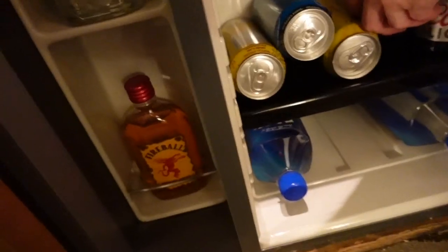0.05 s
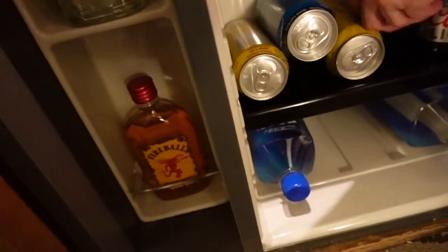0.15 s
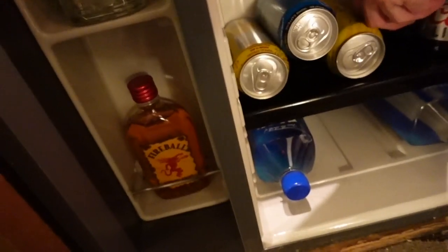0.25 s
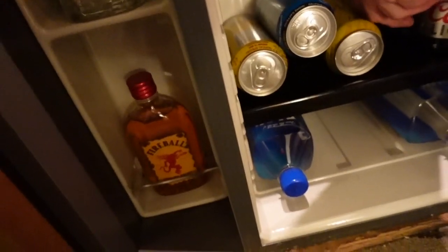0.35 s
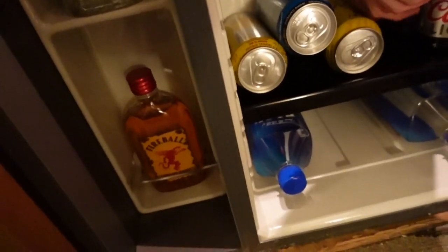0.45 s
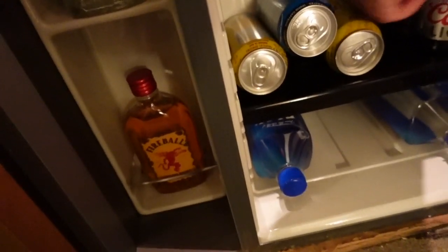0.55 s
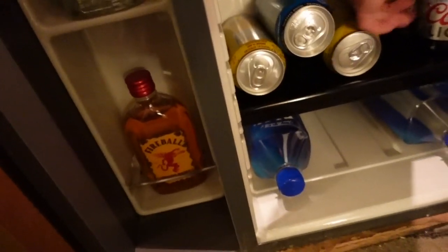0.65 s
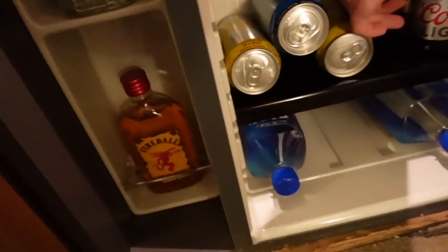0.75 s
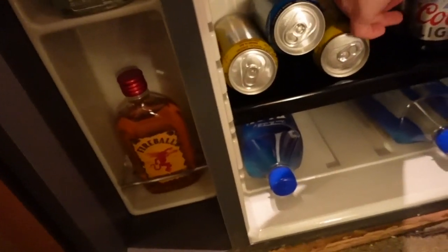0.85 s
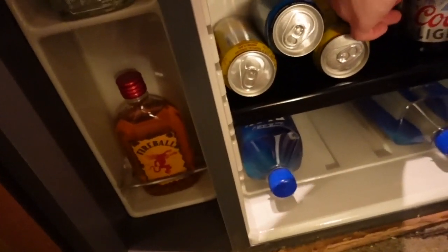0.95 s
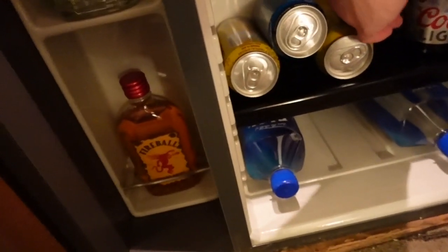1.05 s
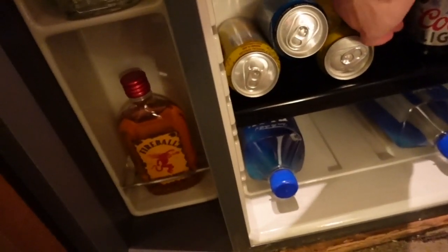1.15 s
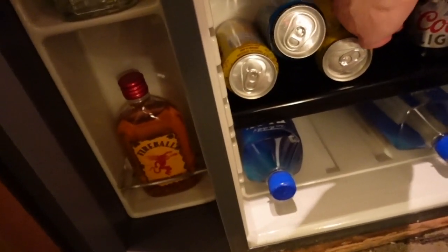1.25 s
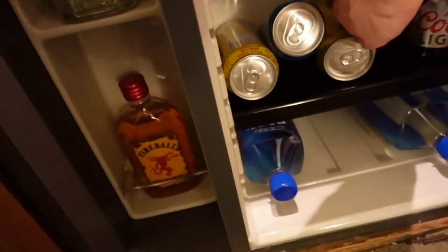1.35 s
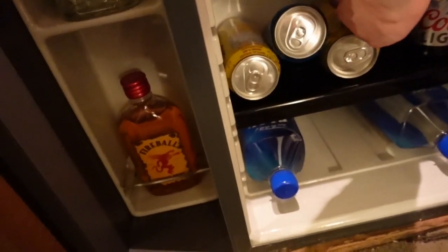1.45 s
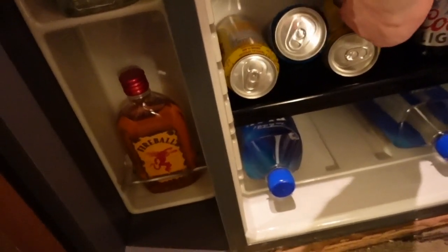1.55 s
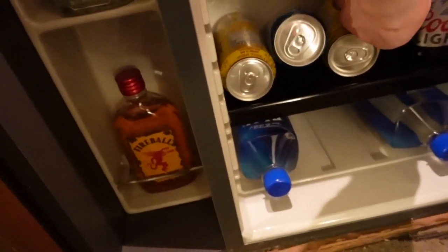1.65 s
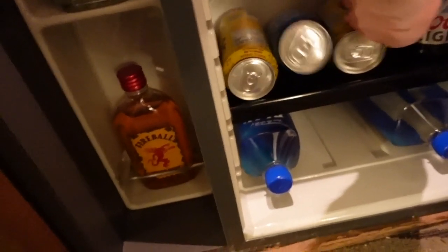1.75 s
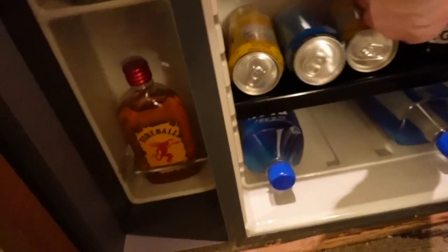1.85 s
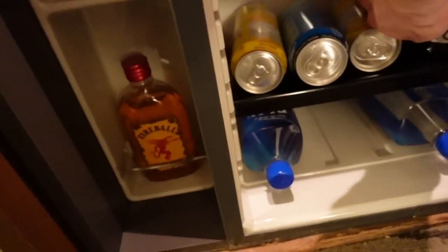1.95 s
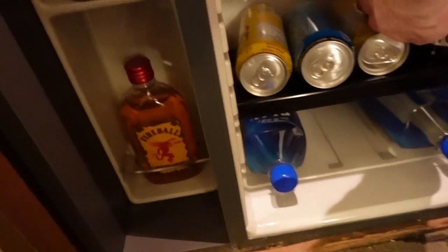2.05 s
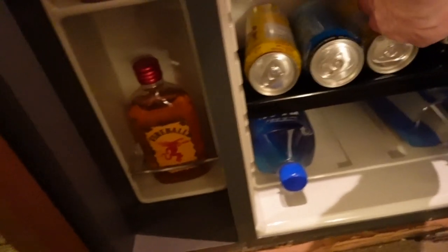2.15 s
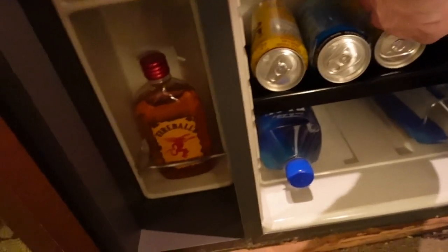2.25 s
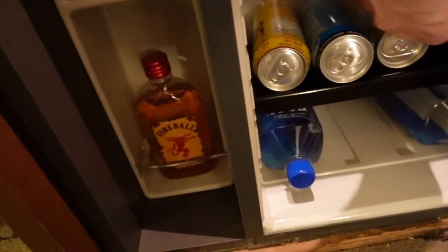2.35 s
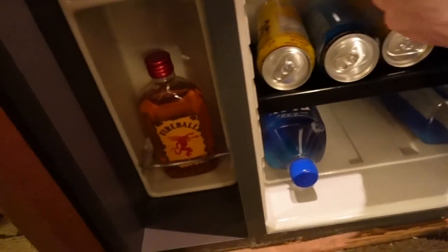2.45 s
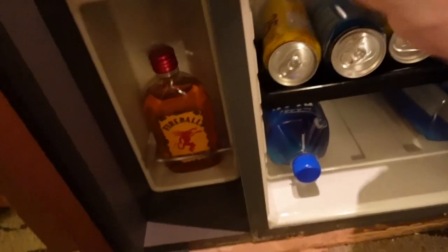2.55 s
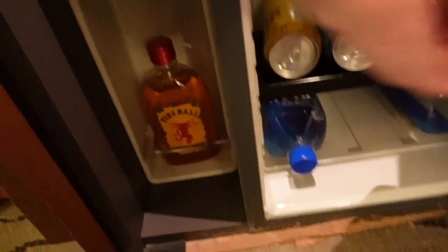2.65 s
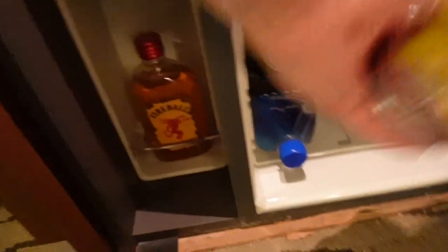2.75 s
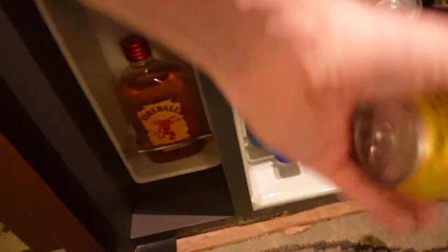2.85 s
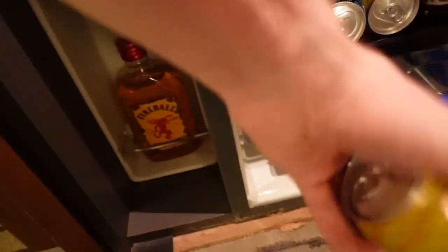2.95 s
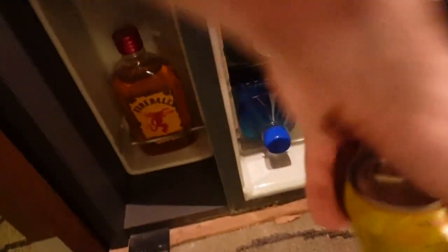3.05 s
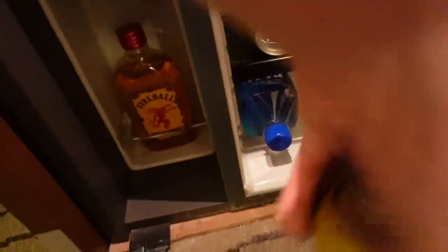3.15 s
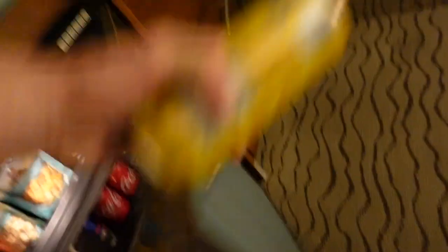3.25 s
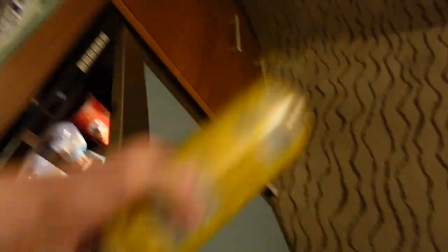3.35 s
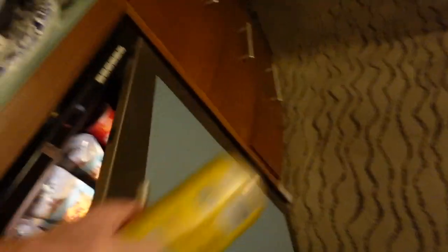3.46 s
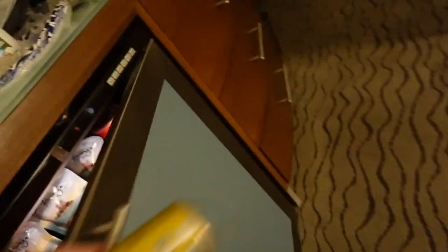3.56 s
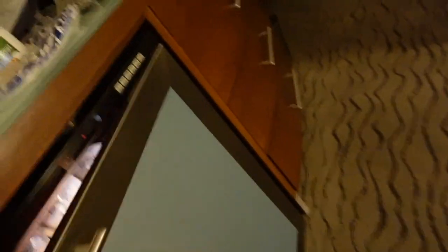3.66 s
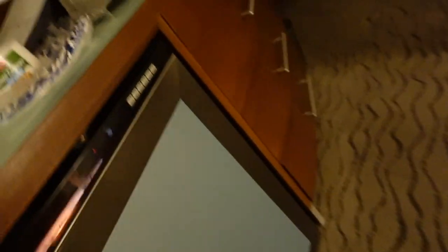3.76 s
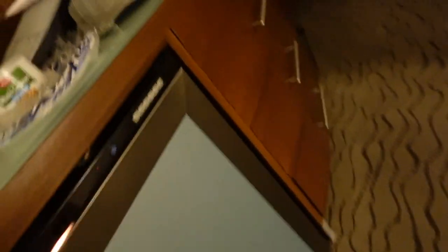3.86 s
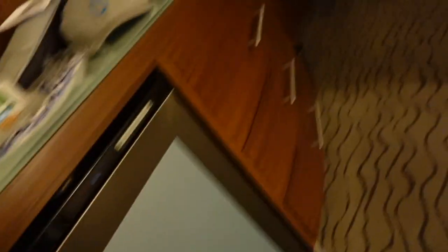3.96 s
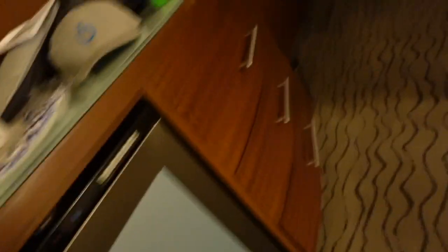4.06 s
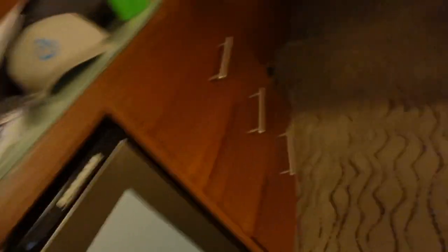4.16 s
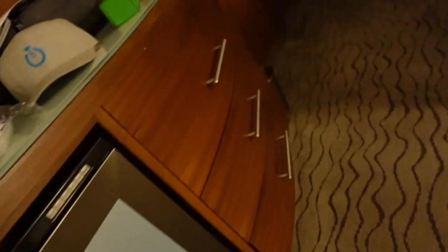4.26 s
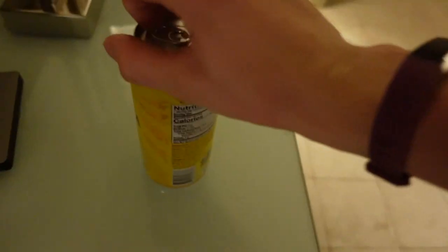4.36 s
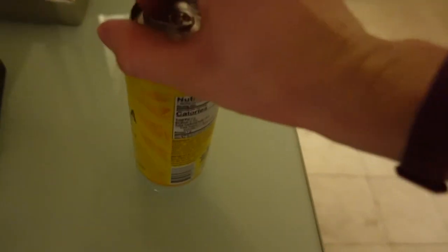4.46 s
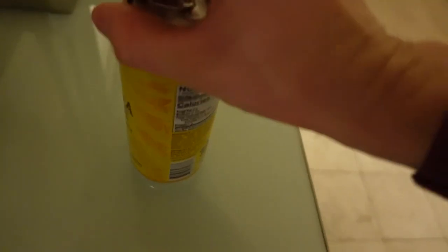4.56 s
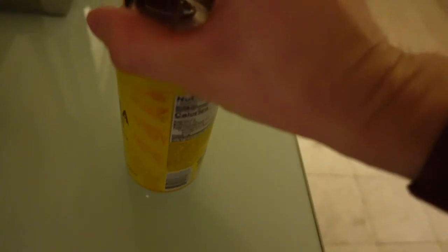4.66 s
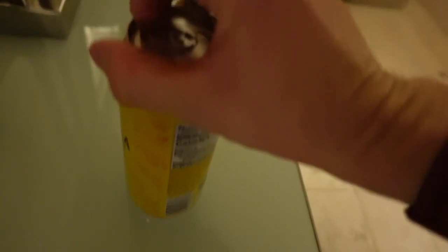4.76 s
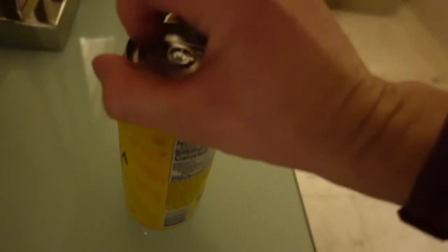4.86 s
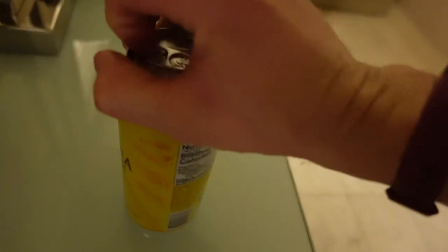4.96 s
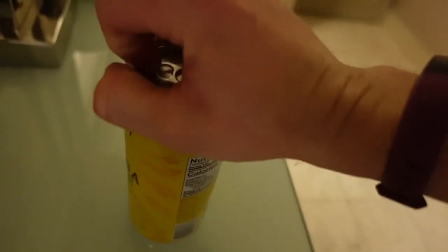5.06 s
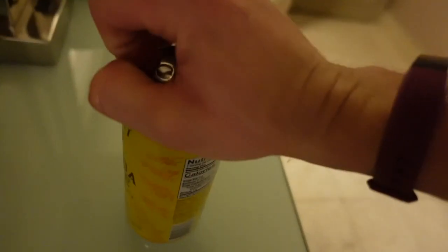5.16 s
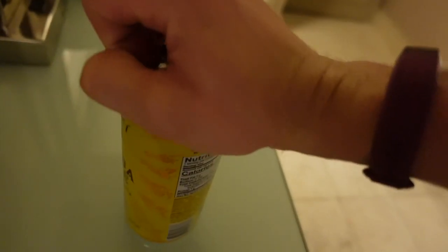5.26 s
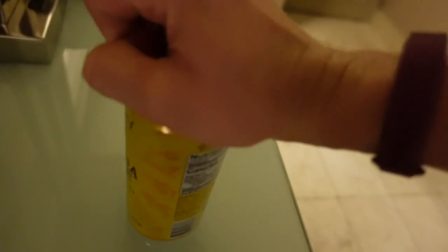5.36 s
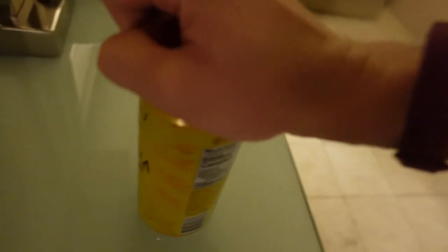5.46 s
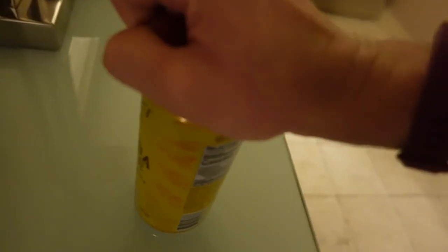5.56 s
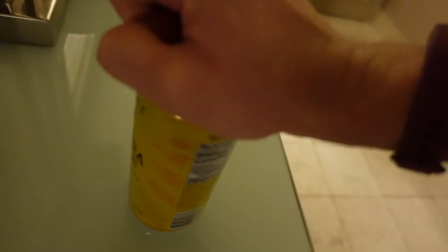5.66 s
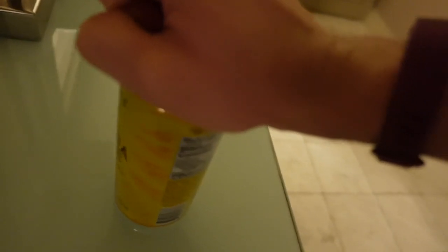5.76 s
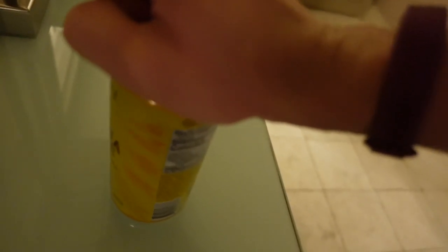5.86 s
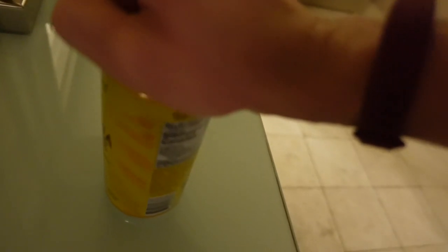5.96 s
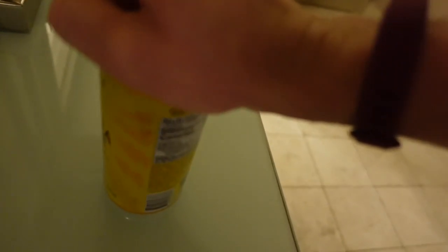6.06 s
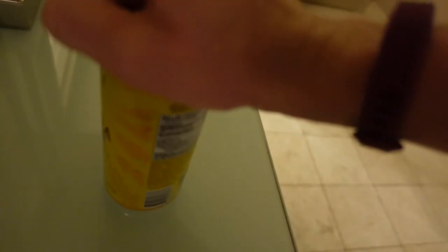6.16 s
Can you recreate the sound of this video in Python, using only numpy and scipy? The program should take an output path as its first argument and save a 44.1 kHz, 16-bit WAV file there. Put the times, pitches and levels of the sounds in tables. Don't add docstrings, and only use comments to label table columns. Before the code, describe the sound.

Close, slightly thin stereo sound, with a short room echo. From 0 to 3.3 seconds a small fridge hums under faint air noise. Fingers rustle on skin and foil, with light can knocks at 0.1, 0.3 and 0.6 and soft shelf thumps until 1.1. At 1.4 a hard clank rings; from 1.7 to 2.2 full cans bang, roll and ring in a dense cluster, the shelf thumping deeply at 1.9. Lighter taps and bright scrapes continue to 3.3 as a can is lifted out. Then quiet room air, with small ticks at 3.35 and 3.7. At 3.93 a door slaps shut with a short low boom and tiny rebounds to 4.2. From 4.5 to 5.5 a fingernail ticks and slides faintly on the lid. Sharp metallic cracks at 5.58, 5.77, 5.85 and 5.99, the last loudest, each release hissing, whistling gas, the final jet draining by 6.2.

```python
import sys
import numpy as np
from scipy import signal
from scipy.fft import rfft, irfft, next_fast_len
from scipy.io import wavfile
from scipy.ndimage import uniform_filter1d

SR = 44100
rng = np.random.default_rng(int(sys.argv[2]) if len(sys.argv) > 2 else 0)


def level_to_linear(level):
    exponent = np.asarray(level, float) / 20
    return 10 ** exponent


def generate_wav(sig):
    pcm = np.round(np.clip(np.atleast_2d(sig).T, -1, 1) * 32767).astype(np.int16)
    wavfile.write(sys.argv[1], SR, pcm)


N = 273506
T = np.arange(N) / SR
CHANGE_S = 3.322
SHELF_HZ = 147.2


def evened(x):
    return x / np.sqrt(np.mean(x ** 2) + 1e-20)


def read(points, hz):
    f, value = np.transpose(points)
    return np.interp(np.log(hz + 1), np.log(f + 1), value)


def add(mix, start_s, sound):
    part = mix[round(start_s * SR):][:len(sound)]
    part += sound[:len(part)]


def passed(x, order, hz, kind):
    return signal.lfilter(*signal.butter(order, hz, kind, fs=SR), x)


def tuned(x, hz, width_hz):
    return signal.lfilter(*signal.iirpeak(hz, hz / width_hz, SR), x)


def resonate(x, hz, width_hz):
    turn = np.exp(2j * np.pi * np.cumsum(hz * np.ones(len(x))) / SR)
    r = np.exp(-np.pi * width_hz / SR)
    return 2 * (turn * signal.lfilter([1 - r], [1, -r], x / turn + 1e-18)).real


def colour(x, points, modes_db=0):
    size = next_fast_len(len(x), True)
    hz = np.fft.rfftfreq(size, 1 / SR)
    knots_hz = np.arange(0, SR / 2, 45)
    peaks = np.interp(hz, knots_hz, rng.standard_normal(len(knots_hz)))
    gain = level_to_linear(read(points, hz) + modes_db * peaks)
    return evened(irfft(rfft(x, size) * gain, size)[:len(x)])


def flicker(hz, depth_db):
    return level_to_linear(depth_db * evened(passed(rng.standard_normal(N), 1, hz, "low")))


def envelope(t60, rise, size=12000):
    t = T[:size]
    return level_to_linear(-60 * t / max(t60, .005)) * (1 - np.exp(-t / max(rise, 1e-4)))


def ring(hz, t60, rise, phase=0):
    fade = envelope(t60, rise)
    return np.sin(2 * np.pi * hz * T[:len(fade)] + phase) * fade


def clink(hz, t60):
    fade = envelope(t60, 0.00071)
    rough = evened(tuned(rng.standard_normal(len(fade)), hz, 0.199 * hz + 20))
    return 0.76 * ring(hz, t60, 0.00046) + 0.44 * rough * fade


def click(low_hz, high_hz):
    pulse = passed(signal.unit_impulse(400), 2, [low_hz, high_hz], "band")
    return pulse / abs(pulse).max()


def burst(points, t60, rise, treble_db=0):
    fade = envelope(t60, rise)
    noise = colour(rng.standard_normal(len(fade)), points, modes_db=4.5)
    dull = passed(noise, 2, 4500, "low")
    bright = passed(noise, 2, 4500, "high")
    return dull * fade + level_to_linear(treble_db) * bright * envelope(0.5 * t60, rise)


# pitch_hz, level_db (per Hz)
FRIDGE = [(15, -79), (25, -26.5), (59, -34.5), (122, -3), (240, -16), (346, -27), (485, -21), (645, -12.5),
          (978, -13.5), (1780, -24), (2310, -32.5), (2630, -15.5), (9890, -17.5), (11600, -17.5),
          (12500, -48)]
ROOM = [(15, -58.5), (25, -31), (64, -17), (113, -2.5), (200, -3.5), (383, -14), (566, -4), (628, -3.5),
        (1080, -16.5), (1480, -16), (1920, -14), (3230, -22), (3680, -22.5), (10400, -33), (12500, -37.5)]
# pitch_hz, width_hz, level_db
FRIDGE_HUM = [(116.7, 12, -54), (637, 110, -61), (839, 25, -64.5), (1600, 110, -62.5), (1910, 40, -69)]
ROOM_HUM = [(128.8, 15, -70), (209, 7.7, -62.5), (646, 74, -71.5), (2060, 120, -71), (2250, 90, -73)]
# pitch_hz, likeness (0 to 1)
SAME_FLOOR = [(60, 0.96), (170, 1), (500, 0.12), (1460, 0.139), (4240, 0.36), (12300, 0.62)]


def air(points, level_db, hums):
    sides = []
    for _ in range(2):
        side = level_to_linear(level_db) * colour(rng.standard_normal(N), points)
        for hz, width_hz, hum_db in hums:
            side += level_to_linear(hum_db) * evened(tuned(rng.standard_normal(N), hz, width_hz))
        sides.append(side)
    left, other = sides
    size = next_fast_len(N, True)
    same = np.clip(read(SAME_FLOOR, np.fft.rfftfreq(size, 1 / SR)), 0, 1)
    right = irfft(same * rfft(left, size) + np.sqrt(1 - same ** 2) * rfft(other, size), size)[:N]
    return np.array([left, right]) * flicker(hz=2.7, depth_db=-0.64)


# pitch_hz, level_db, t60_s
CANS = [(377, -14.5, 0.078), (425, -1.5, 0.067), (585.7, -5, 0.27), (827, -4.5, 0.12), (961, -7, 0.24),
        (1067, -11.5, 0.18), (1181, -10.5, 0.43), (1526, -10, .2), (1950, -16, 0.14), (2707, -7, .08),
        (3206, -15.5, 0.26)]
# time_s, level_db
ROLLING = [(0, -90), (.5, -86), (.63, -52), (.86, -64.5), (1.02, -56), (1.15, -77), (1.39, -52.5),
           (1.46, -41.5), (1.62, -50.5), (1.712, -44), (1.8, -56), (1.86, -27), (2.15, -32.5), (2.3, -41),
           (2.8, -51), (3, -50), (3.07, -60), (3.33, -50)]
# peak_s, level_db, swell_s, fade_s (both per 20 dB)
STROKES = [(.17, -66.5, .4, 0.5), (.38, -59, .09, 0.2), (.78, -53.5, 0.33, 1), (.92, -45, 0.15, 0.14),
           (1.395, -46.5, 0.2, 0.1), (1.71, -34.5, 0.057, 0.02), (1.67, -49, 0.28, 0.7),
           (2.001, -32, .22, 0.01), (2.72, -53.5, 0.16, 9), (3, -46.5, 0.47, .5), (3.3, -57, .3, 2.5),
           (2.575, -48, 0.079, 0.2)]
# pitch_hz, level_db (per Hz)
RUSTLE = [(710, -26.5), (1200, -2), (1350, -17.5), (1520, -3), (4290, -5.5), (4880, -4), (11200, -19),
          (12000, -37.5), (12500, -69.5)]


def rubs():
    roll_db = np.interp(T, *np.transpose(ROLLING))
    shelf_db = -49.5 + 0.44 * (roll_db + 49.5)
    strokes = [level_to_linear(db - 20 * np.maximum((s - T) / swell, (T - s) / fade)) for s, db, swell, fade in STROKES]
    skin = level_to_linear(-72) + np.max(strokes, 0)
    slips = rng.standard_normal((3, N))
    slips[1] *= flicker(hz=150, depth_db=3.5)
    shelf = tuned(slips[0], 152, 25) + 0.22 * tuned(slips[0], SHELF_HZ, 20) + 4.0 * tuned(slips[0], 202, 35)
    shelf = evened(tuned(shelf, 150.0, 140.5))
    roll = sum(level_to_linear(db - 2.7 * hz / 1000) * evened(tuned(slips[1], hz, 16)) for hz, db, _ in CANS)
    roll += 0.65 * evened(tuned(tuned(slips[1], 400, 900), 450, 600))
    roll = evened(roll * flicker(hz=30, depth_db=1.7))
    held = evened(tuned(slips[2], 3180, 90)) * np.clip((T - 2.8) / 0.194, 0, 1)
    rustle = (colour(slips[2], RUSTLE, modes_db=2.5) + 0.5 * held) * flicker(hz=60.7, depth_db=2.0)
    mix = level_to_linear(shelf_db) * shelf + level_to_linear(roll_db) * roll + skin * evened(rustle)
    return mix * (T < CHANGE_S)


# start_s, crack_db, body_db, t60_s
KNOCKS = [(0.111, -25.5, -40.5, 0.036), (0.317, -30, -72, 0.035), (0.5983, -29, -37, 0.057),
          (.6853, -42, -33.5, 0.11), (0.7384, -35, -41, 0.046), (0.8507, -43, -36, 0.21),
          (0.8779, -40, -50, 0.15), (1.017, -30, -36, 0.053), (1.4066, -3.5, -18, .075),
          (1.4298, -11, -15, 0.077), (1.7058, -21, -22, 0.066), (1.8165, -13.5, -12, 0.077),
          (1.8822, -7, -15, 0.12), (1.9484, -3, -7, 0.036), (2.0282, -14, -12.5, 0.077),
          (2.0874, -8, -13, 0.1), (2.1394, -29, -22, 0.31), (2.2197, -22, -22, 0.043),
          (2.2424, -40, -21, 0.04), (2.339, -31.5, -21.5, 0.08), (2.4202, -34, -28.5, 0.088),
          (2.535, -35, -36.5, 0.34), (2.712, -37.5, -50.5, 0.16), (2.7548, -30.5, -48, 0.19),
          (2.8923, -24.5, -33, 0.089), (2.9549, -16.5, -32, 0.051), (3.031, -28, -56, 0.15),
          (3.0872, -28.5, -35, 0.094), (3.1467, -21.5, -49, 0.037), (3.245, -30, -38.5, 0.059)]
# pitch_hz, level_db (per Hz)
CRACK = [(470, -70.5), (800, -18), (1070, -11), (1440, -4.5), (2970, 1.5), (3490, 3.5), (6640, 10.5),
         (10800, -18.5), (12500, -64)]


def knocks():
    out = np.zeros(N)
    rise = .0016
    for s, crack_db, body_db, t60 in KNOCKS:
        modes = 0
        for hz, db, own_t60 in CANS:
            a, b, c = rng.standard_normal(3)
            modes += level_to_linear(db + 2.36 * a) * ring(hz * (1 + 0.0167 * b), 0.65 * own_t60, 2.8 * rise, 2 * c)
        rattle = evened(tuned(tuned(rng.standard_normal(len(modes)), 510, 1200), 510, 1200))
        body = 0.22 * modes + 0.49 * rattle * envelope(1.67 * t60, 2.8 * rise)
        add(out, s, 0.78 * level_to_linear(crack_db) * burst(CRACK, t60, rise, treble_db=-1.5))
        add(out, s + rise, 0.52 * level_to_linear(crack_db) * click(2500, 8000))
        add(out, s, level_to_linear(body_db) * body)
    return out


# start_s, level_db, pitch_hz, t60_s
PINGS = [(.112, -52, 2745, 0.03), (1.02, -31, 4570, 0.026), (1.408, -19, 2770, 0.16),
         (1.438, -18, 377, 0.17), (1.407, -17.5, 1950, .07), (1.424, -17, 587, .13),
         (1.47, -29, 2230, 0.17), (1.44, -23, 250, 0.22), (1.42, -16.5, 978, 0.1),
         (1.43, -26.5, 1167, 0.39), (1.82, -22.5, 1890, 0.088), (1.818, -22, 1165, .06),
         (1.82, -22, 3060, .05), (1.822, -23, 2680, .07), (1.884, -21.5, 1606, 0.14),
         (1.886, -21, 609, .25), (1.886, -22, 2396, 0.12), (1.952, -22.5, 2496, 0.28),
         (1.95, -23.5, 1530, 0.11), (1.955, -20, 1067, .12), (1.95, -24, 420, .1), (2.035, -22.5, 448, .12),
         (2.09, -21, 3410, .04), (2.1, -19.5, 996, 0.06), (2.12, -24, 1188, .2), (2.11, -21.5, 597, 0.21),
         (2.12, -26.5, 830, .3), (1.884, -16.5, 425, 0.22), (1.948, -6, 2840, 0.034),
         (2.029, -15, 1060, 0.05), (2.1, -26, 2460, 0.063), (2.338, -36, 3990, 0.053),
         (2.421, -37, 3950, 0.055), (2.715, -38.5, 3830, 0.06), (2.77, -37.5, 4710, 0.088),
         (2.775, -37, 1183, 0.22), (2.78, -41.5, 3536, 0.22), (2.893, -28.5, 4380, 0.056),
         (2.956, -17, 745, 0.06), (2.957, -29.5, 2016, 0.067), (3.087, -25, 2350, 0.032),
         (3.148, -30.5, 3170, 0.092), (2.535, -39.5, 2800, 0.085), (3.03, -38, 2900, .06),
         (3.25, -37.5, 564, 0.18), (4.215, -34.5, 425, 0.059)]


def pings():
    out = np.zeros(N)
    for s, db, hz, t60 in PINGS:
        add(out, s, level_to_linear(db) * clink(hz, t60))
    return out


# start_s, level_db, t60_s
SPARKS = [(0.112, -44, 0.047), (.6, -43, 0.045), (1.018, -39, 0.058), (1.948, -28, .04),
          (2.222, -37.5, .04), (2.885, -47, .08), (2.955, -31.5, 0.057), (3.02, -51, .15),
          (3.147, -42, .04), (3.275, -51, 0.053), (4.085, -53, 0.092), (4.587, -51, 0.049)]
# pitch_hz, level_db (per Hz)
SPARK = [(3500, -41), (5500, -6), (8000, 1), (10500, -9), (11900, -13), (12500, -53.5)]


def sparks():
    out = np.zeros(N)
    for s, db, t60 in SPARKS:
        fade = envelope(t60, 0.0013)
        add(out, s, level_to_linear(db) * colour(rng.standard_normal(len(fade)), SPARK, modes_db=2.0) * fade)
    return out


# start_s, low_db, upper_db, upper_hz, t60_s
THUMPS = [(.615, -28.5, -35, 185, 0.088), (.689, -27, -19, 172.2, .12), (.716, -30, -25, 178, .1),
          (.852, -25, -20, 193, .09), (.878, -27, -23, 190, .2), (.999, -27.5, -25, 196.7, 0.11),
          (1.107, -29.5, -39, 182, 0.13), (1.41, -38.5, -23.5, 214, 0.17), (1.434, -23.5, -26, 183, 0.32),
          (1.707, -35.5, -42.5, 171, 0.32), (1.821, -38, -26, 180, .16), (1.885, -18.5, -8.5, 215, 0.1),
          (1.952, -30, -16, 220.4, .22), (2.088, -40, -31, 210, 0.16)]


def thumps():
    out = np.zeros(N)
    for s, low_db, upper_db, hz, t60 in THUMPS:
        buzz = sum(ring(k * hz, 0.27 * t60, 0.0037) / (k - 1) for k in range(2, 6))
        upper = ring(hz, t60, 0.0049) + level_to_linear(-21.5) * buzz
        low = ring(SHELF_HZ, 0.86 * t60, 0.0029)
        add(out, s, 1.12 * (level_to_linear(low_db) * low + level_to_linear(upper_db) * upper))
    return out


# start_s, level_db, low_hz, high_hz
TAPS = [(.686, -34, 500, 3000), (.851, -34, 500, 3000), (1.019, -30, 2500, 10000), (2.0283, -14, 700, 4000),
        (2.0897, -13, 1500, 6000), (2.0922, -11, 1500, 6000), (2.3369, -24, 900, 6000),
        (2.366, -28, 500, 3000), (2.4192, -25, 900, 6000), (2.47, -32, 500, 4000),
        (3.0862, -25, 1500, 7000)]


def taps():
    out = np.zeros(N)
    for s, db, low_hz, high_hz in TAPS:
        rattle = .12 * rng.standard_normal(2000) * envelope(.035, .001, size=2000)
        add(out, s, level_to_linear(db) * np.convolve(click(low_hz, high_hz), signal.unit_impulse(2000) + rattle))
    return out


# start_s, level_db, ring_hz, second_hz, t60_s
TICKS = [(3.351, -34, 3080, 6100, 0.032), (3.695, -36, 3140, 4660, 0.032),
         (3.766, -41.5, 2120, 3300, 0.055), (4.568, -43, 3600, 5900, 0.0284),
         (4.587, -36, 3400, 5160, 0.061), (4.6502, -34.5, 2190, 5140, 0.045), (4.855, -49, 5200, 6600, .03),
         (4.8943, -50.5, 3000, 4500, 0.037), (5.185, -49, 3800, 4900, .03),
         (5.219, -45.5, 3900, 4600, 0.0226), (5.2375, -52, 1907, 4800, 0.037)]
# time_s, level_db
FINGERS = [(4.5, -82), (4.58, -63), (4.7, -66.5), (4.9, -80), (5.04, -72), (5.12, -79), (5.19, -78),
           (5.28, -66), (5.45, -72.5), (5.58, -99)]


def ticks():
    out = np.zeros(N)
    for s, db, low_hz, high_hz, t60 in TICKS:
        notes = .4 * clink(low_hz, .8 * t60) + .4 * clink(high_hz, .7 * t60)
        add(out, s, level_to_linear(db) * (notes + .2 * burst(CRACK, t60, .0003, treble_db=-6)))
        add(out, s, level_to_linear(db) * click(low_hz, 1.15 * high_hz))
    noise = rng.standard_normal(N)
    skin = .5 * evened(tuned(noise, 4700, 200)) + colour(noise, RUSTLE)
    skin += .45 * evened(tuned(noise, 1900, 120)) * (T > 5.15)
    slide_db = np.interp(T, *np.transpose(FINGERS), -120, -120)
    return out + level_to_linear(slide_db) * skin * flicker(hz=40, depth_db=1.5)


# start_s, slap_db, panel_db, slap_t60_s, panel_t60_s
DOOR = [
    (3.9216, -20.5, -31, 0.1, 0.26),
    (3.9327, -12, -23, 0.084, 0.52),
    (4.085, -42, -39, 0.16, 0.39),
    (4.213, -47, -51, 0.1, 0.28),
]
# pitch_hz, width_hz, level_db
PANEL = [(40, 30, -6), (90.5, 22, -6), (126, 27, 4.5), (180, 40, -4.5), (300, 48, -20), (483, 47, -13.5),
         (740, 130, -23.5)]
# pitch_hz, level_db (per Hz)
SLAP = [(180, -15), (300, -6.5), (802, 0), (1300, -7.5), (1920, -2), (4900, 0.5), (9590, -32), (11700, -49),
        (12500, -84)]
# start_s, level_db, pitch_hz, t60_s
THUD = [(3.935, -25, 128, .25), (3.95, -30, 95, 0.28), (3.99, -33, 150, 0.33), (3.922, -24.5, 500, 0.054),
        (3.94, -24, 720, 0.054), (3.942, -29, 510, 0.079), (3.935, -26, 2100, 0.05)]


def door():
    out = np.zeros(N)
    rise = 0.00052
    for s, slap_db, panel_db, t60, boom_s in DOOR:
        fade = envelope(boom_s, 3 * rise, size=24000)
        shake = rng.standard_normal(len(fade))
        panel = evened(sum(level_to_linear(db) * evened(tuned(shake, hz, width_hz)) for hz, width_hz, db in PANEL))
        add(out, s, 0.68 * level_to_linear(slap_db) * burst(SLAP, t60, rise, treble_db=4.0))
        add(out, s, 0.29 * level_to_linear(panel_db) * panel * fade)
    for s, db, hz, t60 in THUD:
        add(out, s, level_to_linear(db) * ring(hz, t60, 0.0016))
    return out


# start_s, level_db, ring_hz, t60_s, top_hz (of the click)
SNAPS = [
    (5.5848, -12, 4750, .018, 9000),
    (5.7692, -4.5, 4200, .012, 5000),
    (5.8487, -1, 4600, .009, 11000),
    (5.9870, 0, 4700, .011, 9000),
]


def snaps():
    out = np.zeros(N)
    for s, db, hz, t60, top_hz in SNAPS:
        partials = [(1, .7), (.85, .25), (1.12, .3), (1.45, .15)]
        notes = sum(gain * ring(ratio * hz, t60, .0003) for ratio, gain in partials)
        crack = burst(CRACK, t60, .0003, treble_db=top_hz / 700 - 12)
        add(out, s, level_to_linear(db) * (notes + .2 * top_hz / 9000 * crack))
        add(out, s, .45 * level_to_linear(db) * click(2200, top_hz))
    return out


# start_s, build_s, drain_s (to -20 dB)
BURSTS = [
    (5.588, .1, .068),
    (5.772, .02, .13),
    (5.852, .018, .115),
    (5.99, .02, .2),
]
# jet_db, low_whistle_db
FLOWS = [(-22.5, -40), (-22.5, -28.5), (-19.5, -29.5), (-19.5, -26)]
# pitch_hz, level_db (per Hz)
JETS = [
    [(300, -66), (1570, -25), (1710, -22.5), (3170, -13.5), (3990, 0), (9500, -8.5), (11900, -15),
     (12500, -54.5)],
    [(300, -66), (989, -32.5), (1730, -1.5), (2450, -25), (4160, -1.5), (5300, -17), (8500, -33),
     (12500, -72)],
    [(300, -52), (1260, -16.5), (1890, -0.5), (2820, -19), (4470, -7), (10900, -25.5), (11700, -33),
     (12500, -80)],
    [(300, -30), (882, -18), (2180, -4), (2860, -9.5), (4800, 0), (9440, -21.5), (11400, -36.5),
     (12500, -75)],
]
# low_start_hz, low_end_hz, upper_start_hz, upper_end_hz, upper_db (re jet)
WHISTLES = [(1787, 1690, 4050, 3950, -10.5), (1743, 1800, 4020, 4420, -7.5), (1970, 1790, 4600, 4250, -8),
            (2195, 2220, 3980, 4150, -9)]
# pitch_hz, width_hz; then the share taken away in each burst
SHADOWS = [(8700, 500), (10600, 1100)]
SHADOW_DEPTHS = [0.11, .95, 0.36, .9]
# pitch_hz, width_hz, level_db (re last jet)
HOLLOW = (890, 56, -17)


def gas():
    out = np.zeros(N)
    last_s = 6.21
    ends = [row[0] - .006 for row in BURSTS[1:]] + [last_s]
    rows = zip(BURSTS, FLOWS, ends, JETS, WHISTLES, SHADOW_DEPTHS)
    for (s, build, drain), (jet_db, low_db), end, jet, (*hz, upper_db), depth in rows:
        t = T[:round((end - s) * SR)]
        rising = level_to_linear(-9 * (1 - t / build))
        drained = (t - build) / drain
        falling = level_to_linear(-20 * drained ** 2) + level_to_linear(-19) * drained
        flow = np.where(t < build, rising, falling)
        low_hz, high_hz = np.linspace(hz[::2], hz[1::2], len(t)).T
        noise = rng.standard_normal((4, len(t)))
        sound = colour(noise[0], jet, modes_db=2.0)
        sound = sound + level_to_linear(upper_db) * evened(resonate(noise[2], high_hz, 150))
        for shadow in SHADOWS:
            sound = sound - depth * tuned(sound, *shadow)
        if end == last_s:
            hollow_hz, width_hz, hollow_db = HOLLOW
            sound += level_to_linear(hollow_db) * evened(tuned(noise[3], hollow_hz, width_hz))
        low = evened(resonate(resonate(noise[1], low_hz, 160), low_hz, 450))
        ease = signal.windows.tukey(len(t), .03)
        add(out, s, flow * (level_to_linear(jet_db) * sound + level_to_linear(low_db) * low) * ease)
    return out * flicker(hz=83.3, depth_db=.7)


# pitch_hz, t60_s
TAIL = [(100, 0.348), (500, 0.45), (2000, 0.46), (6000, 0.25), (12000, 0.099)]


def echoes(x):
    hits = np.zeros((2, SR // 2))
    grid = np.arange(200, SR // 2 - 20, 20)
    at = grid + rng.integers(0, 20, (2, len(grid)))
    np.put_along_axis(hits, at, rng.choice([-1., 1.], at.shape), 1)
    hz, t, z = signal.stft(hits, SR, nperseg=256)
    tail = signal.istft(z * level_to_linear(-60 * t / read(TAIL, hz)[:, None]), SR, nperseg=256)[1]
    return signal.fftconvolve(x[None], tail / np.linalg.norm(tail[0]), axes=1)[:, :N]


# pitch_hz, level_db (side minus mid)
WIDTH = [(60, -43.5), (170, -40), (500, -24), (1460, -17), (4240, -10), (12300, -18)]
# time_s, level_db (left minus right)
PAN = [(0.0, -3.5), (1.2, -2), (3.2, -3), (3.6, -0.5), (4.4, 0), (5.3, 1), (5.6, 0), (6.2, -1.2)]


def scene():
    light = rubs() + pings() + sparks() + taps() + ticks() + snaps() + gas()
    heavy = knocks() + thumps() + door()
    wet = echoes(level_to_linear(-9.5) * heavy + level_to_linear(-16.5) * light)
    mid = heavy + light + wet[0]
    paths = rng.standard_normal(1200) * envelope(.03, .0003, size=1200)
    other = signal.oaconvolve(heavy + light, paths / np.linalg.norm(paths))[:N] + wet[1]
    size = next_fast_len(N, True)
    side = irfft(rfft(other, size) * level_to_linear(read(WIDTH, np.fft.rfftfreq(size, 1 / SR))), size)[:N]
    side += level_to_linear(-11.5) * passed(gas(), 2, [2500, 7500], "band")
    lean = np.tanh(np.interp(T, *np.transpose(PAN)) * np.log(10) / 40)
    side += lean * passed(mid, 1, 400, "high")
    fridge_air = air(FRIDGE, -63.5, FRIDGE_HUM)
    room_air = air(ROOM, -58.5, ROOM_HUM) * level_to_linear([[-0.75], [0.75]])
    return np.array([mid + side, mid - side]) + np.where(T < CHANGE_S, fridge_air, room_air)


def gate(x):
    hz, _, z = signal.stft(x, SR, nperseg=1024)
    band = uniform_filter1d(uniform_filter1d((abs(z) ** 2).mean(0), 8, 0), 3, 1)
    around = uniform_filter1d(band, 36, 0)
    weak = band < around * np.interp(hz, [2500, 3500, 8000], [0, .42, .66])[:, None]
    quiet = around < 30 * np.median(around, 1)[:, None]
    weak &= quiet | (hz > 7500)[:, None]
    return signal.istft(z * np.where(weak, .15, 1), SR, nperseg=1024)[1][:, :N]


def low_pass(x):
    return signal.sosfilt(signal.butter(12, 12900, fs=SR, output="sos"), x)


def record(dry):
    thin = signal.sosfilt(signal.butter(2, 60, "high", fs=SR, output="sos"), dry)
    thin = signal.oaconvolve(thin, signal.firwin(63, 11900, fs=SR)[None], "same")
    return low_pass(gate(thin))


dry = scene()
out = record(dry)
generate_wav(out)
```